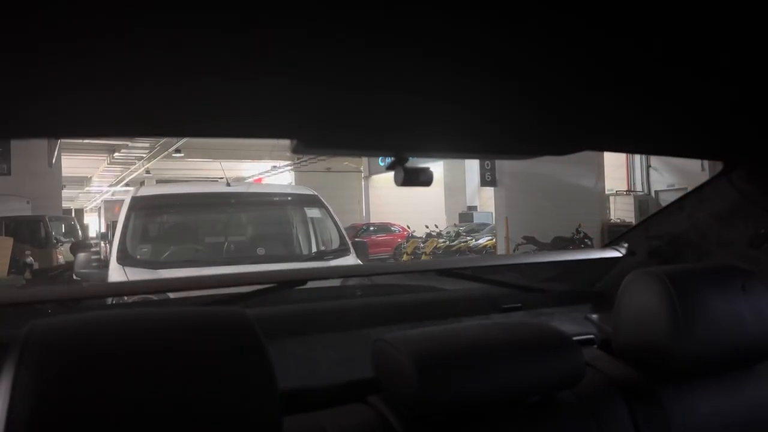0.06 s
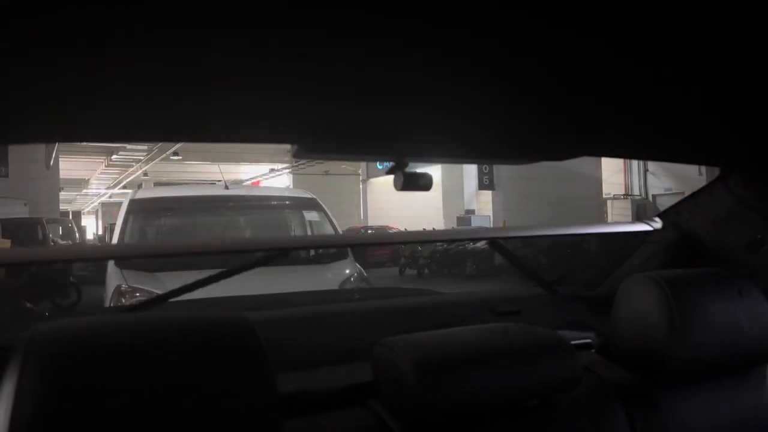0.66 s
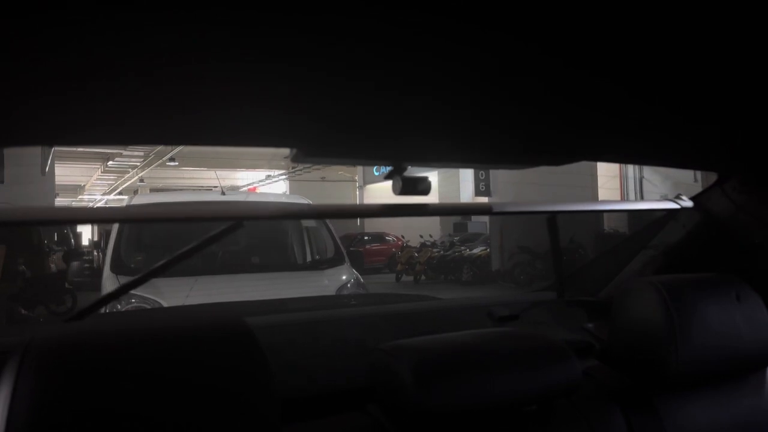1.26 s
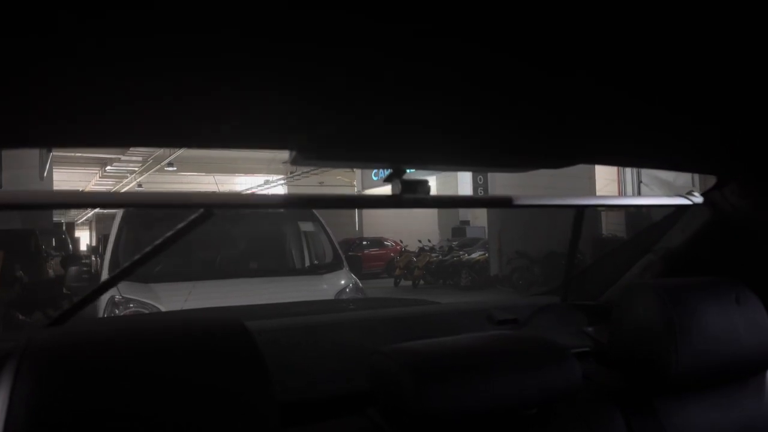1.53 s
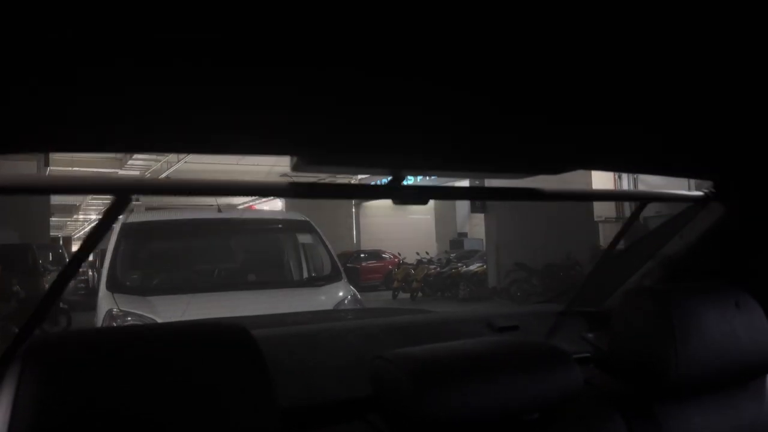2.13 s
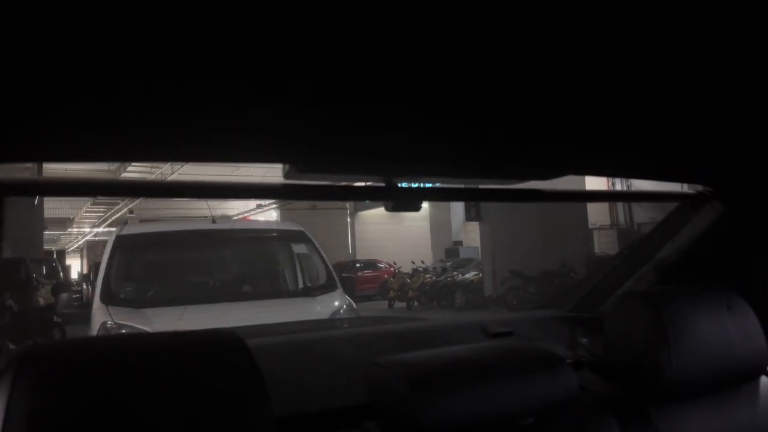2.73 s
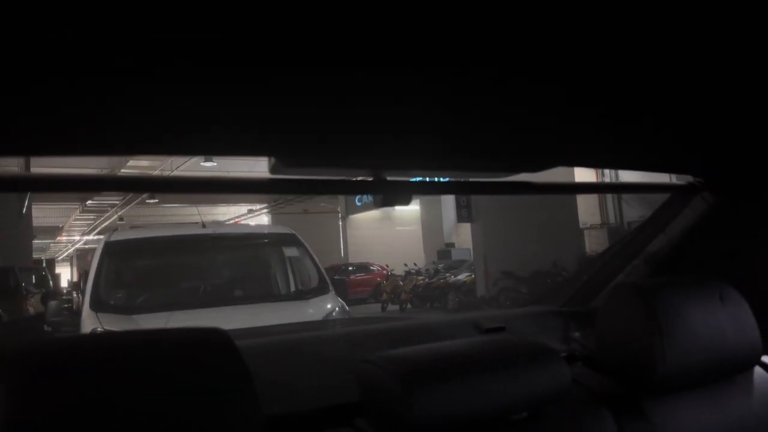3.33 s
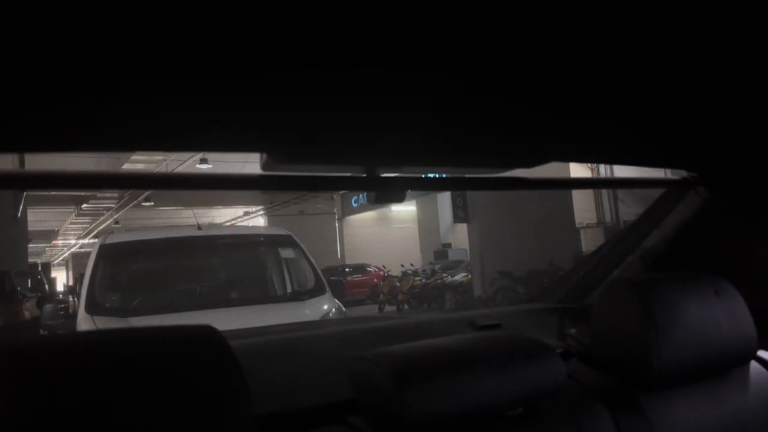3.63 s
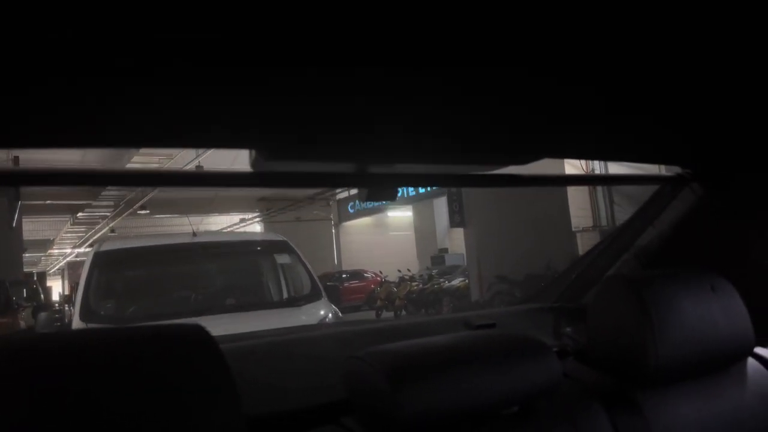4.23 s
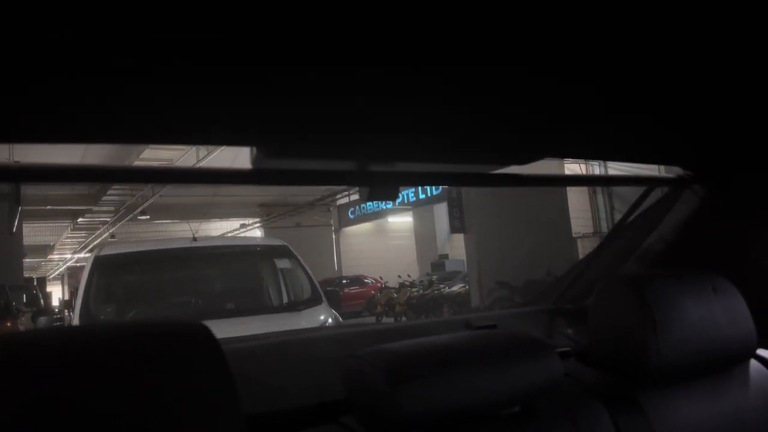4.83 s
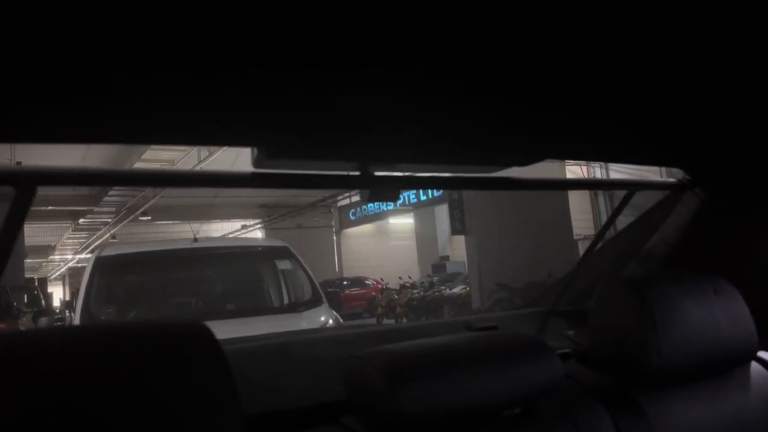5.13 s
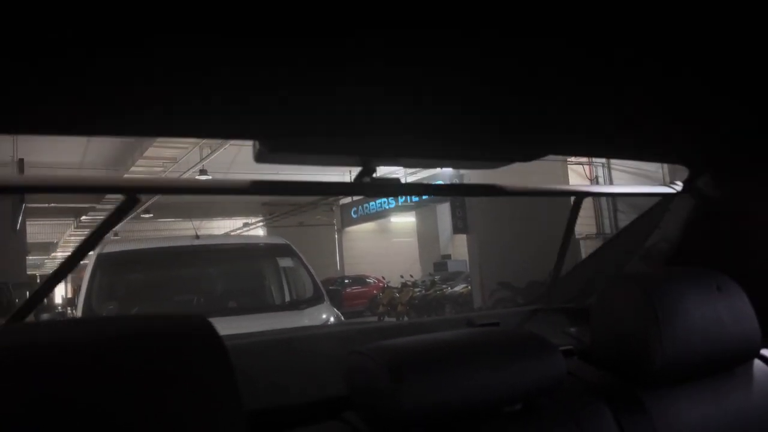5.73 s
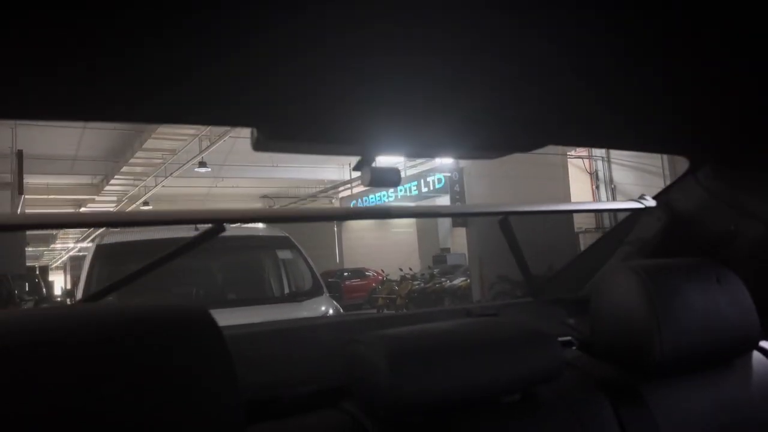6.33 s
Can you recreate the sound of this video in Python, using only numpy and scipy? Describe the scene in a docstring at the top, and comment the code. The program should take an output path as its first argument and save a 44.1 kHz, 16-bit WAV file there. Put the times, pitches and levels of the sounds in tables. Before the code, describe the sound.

Inside an idling car, an electric rear window blind hums and whirrs upward, knocks to a stop, then thumps and winds back down.

```python
"""A parked car idles throughout: the engine's drone beats with a fan's hum under the rush of the vents.
From the start an electric blind rises over the rear window; its motor hums, the gears whirr and whine,
the fabric hisses. At 2.75 s its arms knock on the top stop and it rests. A switch clicks after 4 s.
At 4.6 s the drive reverses with a thump, and the blind winds down until the end."""
import sys
import numpy as np
from scipy import signal
from scipy.fft import rfft, irfft
from scipy.io import wavfile

SR = 44100
rng = np.random.default_rng(int(sys.argv[2]) if len(sys.argv) > 2 else 0)


def store_pcm(level_fs):
    """Save levels as 16-bit WAV."""
    pcm = np.round(np.clip(level_fs, -1, 1) * 32767).astype(np.int16)
    wavfile.write(sys.argv[1], SR, np.atleast_2d(pcm).T)


N = 290065
TIME = np.arange(N) / SR
BINS_HZ = np.fft.rfftfreq(N, 1 / SR)


def gain_of(db):
    """Decibels to amplitude factor."""
    return 10 ** (np.asarray(db) / 20)


def unit_rms(x):
    """Scale to rms 1."""
    return x / np.sqrt(np.mean(x ** 2) + 1e-20)


def over_bins(rows):
    """(frequency [Hz], value) rows on every bin, log-frequency interpolation."""
    hz, value = np.transpose(rows)
    return np.interp(np.log(BINS_HZ + 1), np.log(hz + 1), value)


def over_time(rows):
    """(time [s], value) rows on every sample."""
    return np.interp(TIME, *np.transpose(rows))


def running(start_s, end_s, run_up_s=0.018, coast_s=0.059):
    """Gate: 1 from start to end, run-up before, coast after."""
    return np.interp(TIME, [start_s - run_up_s, start_s, end_s, end_s + coast_s], [0, 1, 1, 0])


def wander(cutoff_hz):
    """Slow random drift, rms 1."""
    grid_s = TIME[::50]
    hz = np.fft.rfftfreq(len(grid_s), grid_s[1])
    spectrum = rfft(rng.standard_normal(len(grid_s))) / (1 + (hz / cutoff_hz) ** 4)
    return unit_rms(np.interp(TIME, grid_s, irfft(spectrum, len(grid_s))))


def stereo(left, right, bass_hz=260):
    """Two spectra to a stereo signal: partly coherent, offset in phase and level."""
    # left-right likeness: (frequency [Hz], coherence [0-1])
    likeness = [(40, 1), (100, 0.6), (170, 0.2), (330, 0.39), (560, 0.45), (760, 0.58), (950, 0.5),
                (1600, 0.66), (1900, 0.43), (2300, 0.3), (2800, 0.4), (3300, 0.04), (9000, 0.05)]
    # left ahead of right: (frequency [Hz], phase [rad])
    lead = [(50, 0.25), (100, 0.5), (170, 1.5), (330, -1.2), (480, -2), (800, -1.83), (1200, -1.37),
            (1650, -2.5), (2150, -3.5), (2450, -6), (2800, -6.5), (9000, -7)]
    # left minus right: (frequency [Hz], level [dB])
    balance = [(60, 2.5), (400, -1), (540, -1.5), (660, 0.5), (1320, -1), (1490, 5.5), (1800, -1),
               (2200, -0.5), (2900, -1), (4400, 0.5), (5800, 4), (7200, -1.5), (9500, -3.5)]
    bass_floor = 1 / (1 + (BINS_HZ / bass_hz) ** 4)  # long waves reach both sides alike
    coherence = np.clip(over_bins(likeness), bass_floor, 1)
    right = coherence * left + np.sqrt(1 - coherence ** 2) * right
    right = right * np.exp(-1j * over_bins(lead))
    tilt = gain_of(over_bins(balance) / 2)
    return irfft(np.array([left * tilt, right / tilt]), N)


def cabin_noise(spectrum_db, ripple_db=1.63):
    """Coloured stereo noise, rms 1, combed by reflections off glass and trim."""
    delays_s = rng.uniform(.003, .025, 16)
    comb = unit_rms(sum(np.cos(2 * np.pi * (BINS_HZ * delay + rng.random())) for delay in delays_s))
    comb_db = ripple_db * comb * np.minimum(BINS_HZ / 2000, 1)
    white = rfft(rng.standard_normal((2, N)))
    return unit_rms(stereo(*white * gain_of(spectrum_db + comb_db)))


def vents(level_db=-42.5, gust_db=0.81):
    """Steady rush of air, coloured by the cabin's resonances."""
    # air spectrum: (frequency [Hz], relative density [dB])
    air = [(30, -23.5), (170, 3), (300, -4), (380, -8), (500, -12.5), (900, -15), (1500, -17.5),
           (1850, -20.5), (2700, -22.5), (4200, -30), (6200, -35), (7300, -39.5), (9300, -41.5),
           (10800, -56.5), (12500, -81.5)]
    # cabin resonances: (frequency [Hz], width [Hz], lift [dB])
    resonances = [(273.3, 26, 4.5), (428.3, 26, 7.5), (537, 36, 8.5), (626, 87, 4), (746, 71, 8),
                  (1130, 48, 4), (1340, 68, 3), (1407, 79, 4), (1486, 75, 3), (1600, 70, 3), (2020, 86, 2),
                  (2278, 110, 5.5), (2520, 90, 1), (2755, 130, 3), (3420, 140, 1.5), (3750, 220, 2.5)]
    lift_db = sum(db / (1 + (2 * (BINS_HZ - hz) / width_hz) ** 2) for hz, width_hz, db in resonances)
    return gain_of(level_db + gust_db * wander(24)) * cabin_noise(over_bins(air) + lift_db)


def fan(hum_hz=90.8, level_db=-40.5, waver_hz=0.34, flutter=0.28, right_db=-5.0):
    """Wavering hum just above the engine's strongest order; the two beat."""
    turns = rng.random() + np.cumsum(hum_hz + waver_hz * wander(2.3)) / SR
    hum = (1 + flutter * wander(3.3)) * np.sin(2 * np.pi * turns)
    return np.sqrt(2) * gain_of(level_db) * hum * gain_of([[0], [right_db]])


def rumble(crank_rad, level_db=-33.0, throb=0.034):
    """Body panels shake around the cabin's boom, hardest once per crankshaft turn."""
    # panel spectrum: (frequency [Hz], relative density [dB])
    panels = [(22, -35), (32, -23), (40, -20.5), (52, -14.5), (66, 0), (80, -2), (102, -6), (130, -10.5),
              (155, -18), (290, -29.5), (400, -34), (900, -92)]
    return gain_of(level_db) * (1 + throb * np.cos(crank_rad)) * cabin_noise(over_bins(panels))


def engine(crank_rad, firing_hz, idle_hz=42.133, swell_db=-1.4, right_db=-1.2):
    """Crank-locked orders: with speed the low ones swell toward the cabin's boom, the high ones ease."""
    # engine orders: (multiple of firing rate [1], relative level [dB])
    orders = [(1, -10), (1.5, -16), (2, 2.5), (2.5, -11.5), (3, -28.5), (4, -14), (5, -19), (7, -29.5)]
    low_db = -32.4 + 5 * (firing_hz - idle_hz) + swell_db * wander(1.8)
    high_db = -31 - 4 * (firing_hz - idle_hz)
    drone = np.zeros(N)
    for multiple, db in orders:
        base_db = low_db if multiple <= 2 else high_db
        depth = 0.027 if db > -6 else 0.1  # uneven combustion shakes weak orders most
        waver = 1 + depth * (wander(4) + 1j * wander(4))
        drone += gain_of(base_db + db) * (waver * np.exp(2j * multiple * crank_rad)).real
    return np.sqrt(2) * drone * gain_of([[0], [right_db]])


def runner_ticks(t60_s=0.042, attack_s=0.001, width_hz=3800):
    """The blind's runners catch and let go: crisp bursts of treble noise."""
    # ticks: (time [s], level [dB], band centre [Hz], left minus right [dB])
    ticks = [(.121, -54, 6700, 0), (.473, -56.5, 8300, 1), (2.767, -63, 8400, 0), (4.061, -61, 5800, -3),
             (4.173, -67, 8800, -2), (4.659, -63, 8200, 0)]
    t = TIME[:SR // 10]
    hz = np.fft.rfftfreq(len(t), 1 / SR)
    out = np.zeros((2, N))
    for time_s, db, centre_hz, balance_db in ticks:
        band = np.exp(-(2 * (hz - centre_hz) / width_hz) ** 4)
        burst = unit_rms(irfft(rfft(rng.standard_normal((2, len(t)))) * band, len(t)))
        envelope = np.minimum(t / attack_s, 1) * gain_of(db - 60 * t / t60_s)
        pan = gain_of([[balance_db / 2], [-balance_db / 2]])
        onset = round(time_s * SR)
        out[:, onset:onset + len(t)] += burst * envelope * pan
    return out


def struck(blows, modes, contact_s, wet_db, cabin_t60_s):
    """Blows ring a set of modes, duller with longer contact; the cabin adds a short scatter."""
    t = TIME[:SR // 4]
    ring = sum(gain_of(db - 60 * t / t60_s) * np.sin(2 * np.pi * hz * t) for hz, db, t60_s in modes)
    ring *= 1 - np.exp(-t / contact_s)
    scatter = rng.standard_normal((2, len(t))) * gain_of(-60 * t / cabin_t60_s)
    paths = gain_of(wet_db) * scatter / np.linalg.norm(scatter[0])
    paths[:, 0] += 1  # direct path
    impulses = np.zeros(N)
    for time_s, db in blows:
        impulses[round(time_s * SR)] += gain_of(db)
    direct = signal.fftconvolve(impulses, ring)[None, :N]
    return signal.fftconvolve(direct, paths, axes=1)[:, :N]


def switch_clicks():
    """Plastic switch and linkage click and rebound."""
    # clicks: (time [s], level [dB])
    clicks = [(4.063, -45), (4.433, -32.5), (4.449, -44), (4.6195, -36), (4.6225, -37.5), (4.630, -42)]
    # plastic modes: (frequency [Hz], gain [dB], t60 [s])
    modes = [(1398, -8.5, 0.061), (1480, -7, 0.047), (2110, -13, 0.032), (2500, -14.5, 0.035),
             (2950, -12, 0.017), (3440, -14.5, 0.022)]
    return struck(clicks, modes, contact_s=.0005, wet_db=-8, cabin_t60_s=.04)


def shelf_jolt():
    """The rear shelf takes up the jolt of reversing."""
    # jolt: (time [s], level [dB])
    jolts = [(4.644, -26)]
    # shelf modes: (frequency [Hz], gain [dB], t60 [s])
    modes = [(56, 9, 0.14), (123, 12, 0.046), (177, 2, 0.065), (257, -2, 0.09)]
    return struck(jolts, modes, contact_s=.003, wet_db=-18, cabin_t60_s=.08)


def arm_knocks():
    """The blind's arms knock at the top stop and on reversing."""
    # knocks: (time [s], level [dB])
    knocks = [(2.746, -38), (2.761, -34), (2.784, -40), (4.624, -23)]
    # arm modes: (frequency [Hz], gain [dB], t60 [s])
    modes = [(287, -12, 0.1), (312, -2.5, 0.079), (385, -9, 0.036), (443, -12, 0.071), (1266, -16, .03),
             (1656, -24, 0.05)]
    return struck(knocks, modes, contact_s=.0018, wet_db=-10, cabin_t60_s=.05)


def snag_power(rate_per_s=160, spread_db=2, decay_s=0.002):
    """Single threads snap on the lip of the slot: power envelope, mean 1."""
    size_db = spread_db * np.minimum(rng.exponential(1, N), 3)
    snaps = gain_of(size_db) ** 2 * (rng.random(N) < rate_per_s / SR)
    power = signal.lfilter([1], [1, -np.exp(-1 / (decay_s * SR))], snaps)
    return power / power.mean()


def fabric(rub_db, snag_share=.2, rustle_db=-0.23, hard_rub_db=-56):
    """Mesh cloth snags over the lip of its slot: hiss and, rubbed hard, sizzle up to about 10 kHz.
    Above that lies a faint, thin treble fizz, not from the cloth."""
    # cloth hiss to about 10 kHz, faint fizz from 11 kHz: (frequency [Hz], relative density [dB])
    hiss_and_fizz = [(800, -15.5), (2200, -2.5), (2900, -5.5), (3600, 1), (4500, 2), (5500, 3), (6400, 1),
                     (7300, 0.5), (9200, -3.5), (10100, -18), (11200, -37), (13500, -26), (15500, -32)]
    # cloth sizzle to about 10 kHz, faint fizz from 11 kHz: (frequency [Hz], relative density [dB])
    sizzle_and_fizz = [(3000, -24), (4800, -3.5), (5450, 7.5), (6300, 7.5), (7200, -7.5), (9900, -10),
                       (11000, -23), (12300, -21.5), (13200, -14), (15500, -13)]
    soft_db = rub_db + rustle_db * wander(14)
    hard_db = hard_rub_db + 2 * (soft_db - hard_rub_db)
    soft = gain_of(soft_db) * cabin_noise(over_bins(hiss_and_fizz))
    hard = gain_of(hard_db) * cabin_noise(over_bins(sizzle_and_fizz))
    return (soft + hard) * np.sqrt(1 + snag_share * (snag_power() - 1))


def gear_whine(shaft_rad, start_s, end_s, fuzz=0.53, fuzz_hz=25):
    """The loaded gearbox sings on shaft orders, each blurred by play in the teeth."""
    # whine orders: (multiple of shaft rate [1], relative level [dB])
    orders = [(4, -0.5), (5, -12.5), (7, 1.5), (12, -9), (14, -8)]
    # whine on the way up: (time [s], level [dB])
    levels = [(0, -57), (.4, -55), (.6, -57), (.95, -58), (1.15, -62), (1.48, -60), (1.75, -64),
              (2.1, -52.5), (2.76, -62)]
    tones = np.zeros((2, N))
    for multiple, db in orders:
        amplitude = np.array([1 + fuzz * wander(fuzz_hz), fuzz * wander(fuzz_hz)])
        tones += gain_of(db) * amplitude * np.sin(multiple * shaft_rad)
    return running(start_s, end_s) * gain_of(over_time(levels)) * unit_rms(stereo(*rfft(tones)))


def motor(shaft_rad, hum_db, whirr_shape, whirr_db, octave_db=-14, flutter=0.27, puff_depth=0.22):
    """The motor hums with three pulls per turn; each pull draws a puff of whirr from the gears."""
    pull_rad = 3 * shaft_rad
    hum = np.sin(pull_rad) * (1 + flutter * wander(10))
    hum += gain_of(octave_db) * np.sin(2 * pull_rad) * (1 + wander(39))
    whirr = cabin_noise(over_bins(whirr_shape)) * (1 + puff_depth * np.cos(pull_rad))
    return np.sqrt(2) * gain_of(hum_db) * hum + gain_of(whirr_db) * whirr


def blind_stroke(shaft_rad, stroke, whirr_shape, unloaded_db=-8, speed_lift_db=2.5,
                 scrape_width_deg=4.2, drag_share=0.5):
    """Arms swing evenly. Half open, motor load peaks and the fabric scrapes; near upright it slows."""
    start_s, end_s, from_deg, to_deg, hum_db, whirr_db, rub_db, scrape_db, scrape_deg = stroke
    arm_deg = over_time([(start_s, from_deg), (end_s, to_deg)])
    fabric_speed = np.cos(np.radians(arm_deg))
    load = np.sqrt(abs(np.sin(2 * np.radians(arm_deg))))
    scrape = np.exp(-((arm_deg - scrape_deg) / scrape_width_deg) ** 2)
    dragging = (to_deg < from_deg) & (arm_deg < scrape_deg)  # going down, past the scrape
    friction = np.maximum(scrape, drag_share * dragging)
    drive = motor(shaft_rad, hum_db, whirr_shape, whirr_db + unloaded_db * (1 - load))
    cloth = fabric(rub_db + speed_lift_db * fabric_speed + scrape_db * friction)
    return running(start_s, end_s) * (drive + cloth)


def blind(shaft_drift_hz=0.45):
    """The motor pushes the blind up with a whine, rests, then eases it down."""
    # motor shaft, sagging under load: (time [s], speed [turns/s])
    shaft_speed = [(0, 112), (.3, 109), (.7, 113), (1, 101), (1.35, 104), (1.7, 105), (2, 113), (2.25, 100),
                   (2.5, 111), (2.76, 110), (4.64, 127), (6.58, 112)]
    # strokes, arms flat at 0 deg, upright at 90: (start [s], end [s], from [deg], to [deg],
    # hum [dB], whirr [dB], rub [dB], scrape lift [dB], scrape angle [deg])
    strokes = [(0, 2.76, 9.4, 90, -55.5, -51.5, -64, 3, 48.5),
               (4.64, 6.6, 90, 38.1, -60.5, -55.5, -65.5, 6.5, 47.8)]
    # gear whirr going up: (frequency [Hz], relative density [dB])
    whirr_up = [(100, -1), (160, 24), (250, -4.5), (420, 12), (500, -9), (660, 8), (770, 9.5), (900, -10),
                (1120, 7.5), (1500, 2.5), (1850, -5), (2250, 3), (2800, 0), (4000, -7.5), (5200, -11),
                (9000, -46)]
    # gear whirr going down: (frequency [Hz], relative density [dB])
    whirr_down = [(300, 6), (1100, -11.5), (1350, -2), (1600, 8.5), (1900, 2.5), (2300, 5), (2700, -9),
                  (3100, -18.5), (9000, -52)]
    rise, fall = strokes
    shaft_hz = over_time(shaft_speed) + shaft_drift_hz * wander(5.14)
    shaft_rad = 2 * np.pi * np.cumsum(shaft_hz) / SR
    up = blind_stroke(shaft_rad, rise, whirr_up) + gear_whine(shaft_rad, *rise[:2])
    return up + blind_stroke(shaft_rad, fall, whirr_down)


def scene():
    """Idling car, with the blind going up and down inside."""
    # idle, picking up slightly toward the end: (time [s], firing rate [Hz])
    idle = [(0, 42.15), (1.2, 42.27), (2.8, 41.65), (4.1, 41.96), (5, 42.51), (6, 43.04), (6.58, 42.6)]
    firing_hz = over_time(idle) + 0.053 * wander(1.66)
    crank_turns = rng.random() + np.cumsum(firing_hz) / 2 / SR  # two firings per turn
    crank_rad = 2 * np.pi * crank_turns
    car = engine(crank_rad, firing_hz) + rumble(crank_rad) + fan() + vents()
    return car + blind() + arm_knocks() + shelf_jolt() + switch_clicks() + runner_ticks()


def record(dry, low_cut_hz=31, high_cut_hz=15500, fade_s=.003):
    """Cut the deepest bass and top treble; fade both ends."""
    highpass = signal.butter(4, low_cut_hz, "highpass", fs=SR, output="sos")
    lowpass = signal.firwin(511, high_cut_hz, window=("kaiser", 9), fs=SR)
    fade = np.clip(np.minimum(TIME, TIME[-1] - TIME) / fade_s, 0, 1)
    return signal.oaconvolve(signal.sosfilt(highpass, dry) * fade, lowpass[None], "same")


dry = scene()
out = record(dry)
store_pcm(out)
```